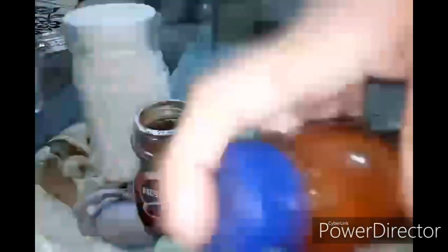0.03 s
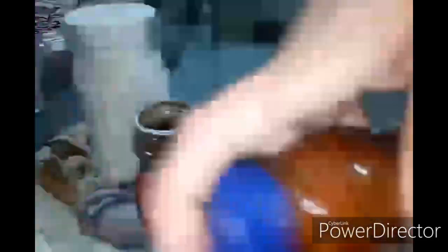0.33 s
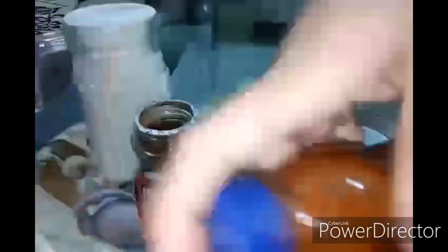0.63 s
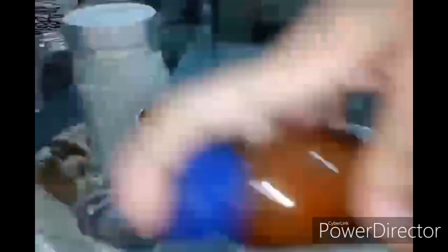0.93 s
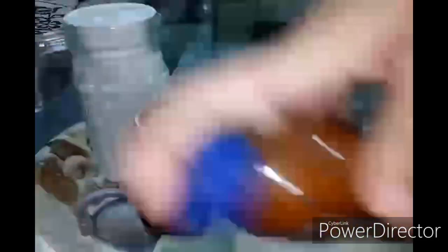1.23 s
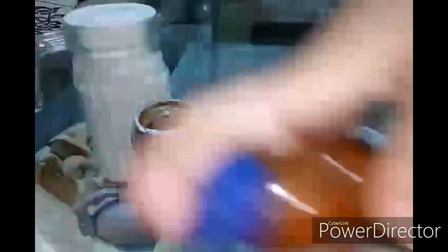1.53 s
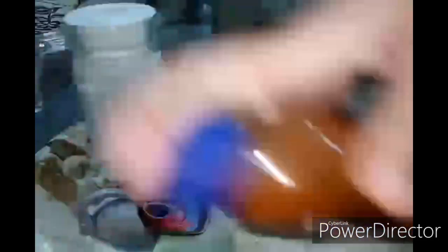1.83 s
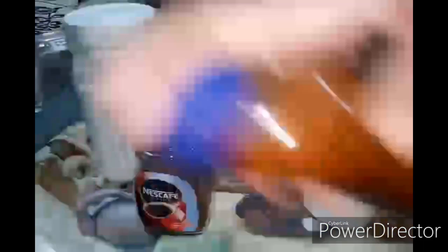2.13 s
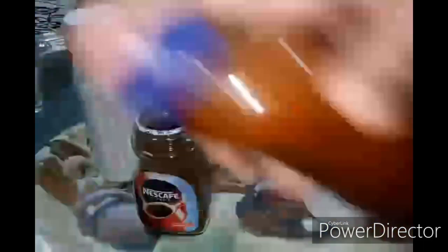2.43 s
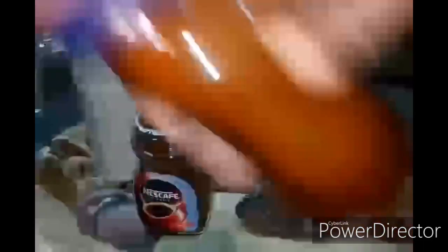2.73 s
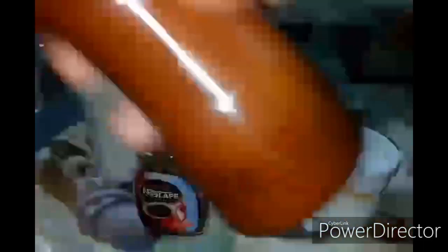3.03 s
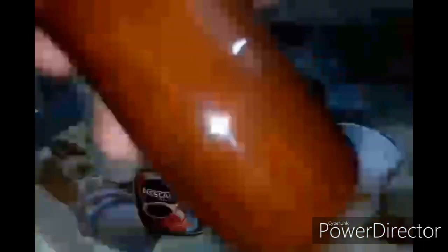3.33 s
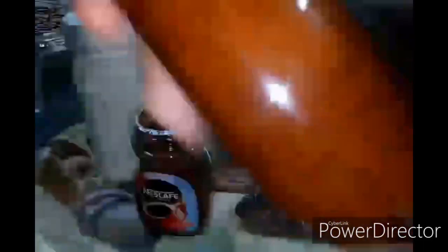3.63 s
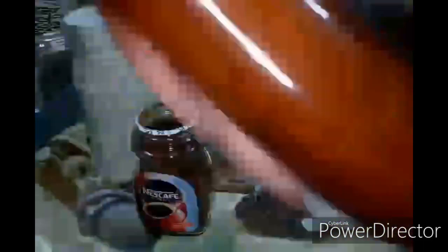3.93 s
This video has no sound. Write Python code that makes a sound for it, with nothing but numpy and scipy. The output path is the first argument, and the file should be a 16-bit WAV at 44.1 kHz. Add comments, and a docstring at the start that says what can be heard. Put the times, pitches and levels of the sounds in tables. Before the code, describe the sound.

Liquid swishes inside a plastic bottle shaken by hand for all four seconds, about three and a half shakes a second, close and slightly left. Bubbly gurgles and small splashes come with the strokes. The plastic knocks now and then, most clearly at about 0.7 and 2.2 seconds. The grip squeaks faintly around 3.6 seconds. A low kitchen hum lies underneath.

```python
"""A kitchen: a plastic bottle of liquid is shaken by hand, about 3.5 times a second.
The liquid is thrown to each end in turn and breaks into a swish of tiny ringing bubbles.
Air pockets glug and gurgle, drops slap and tick on the wall, the plastic knocks now and then.
The air inside rings faintly; the grip squeaks near the end. Low hum and room noise lie underneath."""
import sys
import numpy as np
from scipy import signal
from scipy.fft import rfft, irfft
from scipy.io import wavfile

SR = 44100
rng = np.random.default_rng(int(sys.argv[2]) if len(sys.argv) > 2 else 0)


def persist_wave(psi):
    """Save psi, clipped to +-1, as 16-bit WAV."""
    counts = np.round(np.clip(psi, -1, 1) * 32767).astype(np.int16)
    wavfile.write(sys.argv[1], SR, np.atleast_2d(counts).T)


N = 176400
T = np.arange(N) / SR
FLUTTER_PER_S, PATCHES_PER_S = 73, 19.3  # fast and slow random wavering

# throws of the liquid: (start [s], length [s], swish [dB], slop, gurgle, spray [dB re swish])
THROWS = [(-0.049, 0.066, -33.5, 0, -1, 1.5), (0.102, 0.066, -36, -9.5, -4.5, -0.5),
          (0.218, 0.079, -33, -5, 0, 2.5), (0.383, 0.066, -37.5, 1, -4.5, 0),
          (0.519, 0.094, -35, -26, -2.5, 1.5), (0.695, 0.047, -40.5, 7, 2, 0.5),
          (0.818, 0.084, -33.5, 1, -1.0, 0.5), (0.961, 0.08, -37.5, 0.5, -8, 1.0),
          (1.095, 0.101, -34.5, -1.5, -1.5, -0.5), (1.258, 0.128, -39.0, -11, -2, 1.5),
          (1.389, 0.077, -35.5, 5.5, 2, 1.5), (1.554, 0.055, -36.5, -10, -7, -3.5),
          (1.671, 0.098, -34.5, -1, -0.5, 2), (1.842, 0.057, -37.5, 1, -0.0, -0.5),
          (1.971, 0.082, -34, -1.5, -0.5, 2), (2.137, 0.054, -36.5, -3, -4, 0.5),
          (2.261, 0.074, -34.5, -5, -1, 3), (2.422, 0.074, -39, -1, -7, -0.5),
          (2.547, 0.085, -35, -4, 0.5, 2), (2.714, 0.07, -42, -14, -6.0, -2.5),
          (2.84, 0.084, -37, -5, -4.5, 0), (2.966, 0.058, -39.5, -3, -2, 0),
          (3.094, 0.088, -36, 1.5, 0.5, 1.5), (3.236, 0.11, -43.5, 10.5, -5.0, 0.5),
          (3.383, 0.076, -37, -4, 2, 1.5), (3.527, 0.069, -39.5, 2, 2.5, -1.5),
          (3.651, 0.098, -36.5, -21, 0.5, -0.5), (3.814, 0.114, -41.5, 6, -1.5, -1),
          (3.942, 0.045, -33.5, 8, -0.5, 2)]
# slop, gurgle, swish, spray of a throw: (centre [Hz], delay [s], rise [s], fall [s], rest level [dB])
VOICES = [(540, 0.0074, 0.0031, 0.059, -49), (1210, 0.013, 0.016, 0.054, -67),
          (3000, 0.00063, 0.02, 0.035, -50.5), (10100, 0.0048, 0.043, 0.022, -58.5)]
# liquid hitting the wall: (time [s], level [dB])
SLAPS = [(.112, -28), (.390, -30.5), (.535, -35), (0.7221, -32.5), (1.118, -22.5), (1.56, -29),
         (1.585, -26.5), (1.6887, -36), (1.9217, -25), (2.142, -32.5), (2.274, -33), (3.076, -33.5),
         (3.383, -34), (3.885, -31)]
# stereo balance: (frequency [Hz], left over right [dB])
BALANCE = [(100, 4.5), (400, 7.5), (700, 2.5), (1290, -1.5), (2380, 6), (4400, 15.5), (8100, 9),
           (15000, 7.5)]


def splashing():
    """Bubbles ring a few cycles each in quarter-octave bands, as loud as the throw that makes them."""
    # splash colour through the plastic: (frequency [Hz], relative density [dB])
    spectrum = [(180, -40), (300, -14.5), (430, -12), (560, -11.5), (720, -14), (920, -12.5), (1300, -9.5),
                (1850, -5), (2600, -0.94), (3400, 2.5), (4100, 1), (5000, -6.5), (6700, -11), (8200, -22.5),
                (12000, -22), (15000, -28)]
    edges_hz = np.geomspace(170, 16500, 27)
    centres_hz = np.sqrt(edges_hz[1:] * edges_hz[:-1])
    gains = from_db(at_hz(spectrum, centres_hz)) * np.sqrt(np.diff(edges_hz))
    gains = from_db(-4) * gains / np.linalg.norm(gains)
    log_voice_hz = np.log([voice[0] for voice in VOICES])
    log_power, bursts = np.log(throw_power()), slap_power()
    flutter_db = -1.24 * drift(FLUTTER_PER_S)
    out = np.zeros((2, N))
    for low, high, hz, gain in zip(edges_hz, edges_hz[1:], centres_hz, gains):
        weights = np.array([np.interp(np.log(hz), log_voice_hz, row) for row in np.eye(len(VOICES))])
        power = np.exp(weights @ log_power) + bursts / (1 + (1410 / hz) ** 2)  # slaps lack lows
        rings = butter_filter(bubble_births(hz), [low, high], "band")
        roughness = from_db(flutter_db + 1.2 * drift(PATCHES_PER_S))
        out += gain * np.sqrt(power) * rms_one(stereo(*rings, hz) * roughness)
    return bottle_resonances(out)


def throw_power():
    """Power over time, a row per voice: each throw rises, arches by 1 dB and falls."""
    rows = []
    for k, (_, delay_s, rise_s, fall_s, rest_db) in enumerate(VOICES):
        power = np.full(N, from_db(rest_db) ** 2)
        for start_s, length_s, swish_db, slop_db, gurgle_db, spray_db in THROWS:
            db = swish_db + (slop_db, gurgle_db, 0, spray_db)[k]
            t = T - start_s - delay_s
            fade = np.maximum(-t, 0) / rise_s + np.maximum(t - length_s, 0) / fall_s
            near = fade < 10
            droop_db = (2 * np.clip(t[near] / length_s, 0, 1) - 1) ** 2
            power[near] += (from_db(db - droop_db) * np.exp(-fade[near])) ** 2
        rows.append(power)
    return np.array(rows)


def slap_power():
    """Power of the short bursts of spray where liquid hits the wall."""
    out = np.zeros(N)
    for start_s, db in SLAPS:
        add(out, start_s, (from_db(db) * swell(T[:SR // 10], onset_s=0.0004, decay_s=0.0051)) ** 2)
    return out


def bubble_births(hz):
    """Bubbles start as random clicks of uneven size on fine fizz; two uncorrelated rows."""
    # bubbles per band: (frequency [Hz], births [1/s])
    birth_rate = [(400, 46), (1300, 260), (4000, 480)]
    # single bubbles against fizz: (frequency [Hz], power share [0-1])
    bubble_share = [(500, 0.67), (4000, 0.41), (10000, 0.02)]
    count = 6000
    at, size, chance = rng.integers(0, N, count), rng.exponential(1, count), rng.random(count)
    born = chance < at_hz(birth_rate, hz) * N / SR / count
    gain = from_db(2 * np.minimum(size, 5)) * born
    angle = 2 * np.pi * rng.random(count)
    clicks = np.zeros((2, N))
    clicks[:, at] = gain * np.array([np.cos(angle), np.sin(angle)])
    share = at_hz(bubble_share, hz)
    return np.sqrt(share) * rms_one(clicks) + np.sqrt(1 - share) * rng.standard_normal((2, N))


def bottle_resonances(x):
    """Narrow resonances of the bottle colour the sound inside."""
    # resonances: (frequency [Hz], width [Hz], lift [dB])
    peaks = [(1295, 34, 5.5), (1800, 21, 2), (2660, 170, 0.5), (3540, 31, 2), (3984, 61, 2.5),
             (4260, 48, 6)]
    for hz, width_hz, db in peaks:
        x = x + (from_db(db) - 1) * signal.lfilter(*signal.iirpeak(hz, hz / width_hz, fs=SR), x)
    return x


def glugs():
    """Each big air pocket rings briefly, rising in pitch, and sheds two weaker bubbles."""
    # air pockets: (time [s], pitch [Hz], level [dB], t60 [s], left over right [dB])
    pockets = [(0.4074, 530, -37, 0.013, 5), (0.719, 302, -35, 0.028, 20), (0.868, 470, -34, 0.0091, 10),
               (0.9697, 620, -34.5, 0.0071, 3), (1.118, 544, -26.5, 0.012, 7),
               (1.258, 590, -34.5, 0.026, 2), (1.283, 707, -43, 0.042, 4), (1.573, 771, -44, 0.033, 14),
               (1.6871, 511, -31, 0.03, 14), (1.708, 501, -41.5, 0.058, 7), (1.8796, 553, -31.5, 0.009, -3),
               (1.996, 485, -36, 0.044, 12), (2.161, 576, -37.5, 0.022, 0), (2.4528, 518, -33, 0.011, 3.5),
               (2.566, 565, -42.5, 0.016, 23), (2.283, 580, -44, 0.02, 9), (3.121, 457, -50, 0.014, 4),
               (3.138, 383, -43, 0.04, 4), (3.385, 580, -40.5, 0.024, 12), (3.394, 424, -44, 0.067, -6),
               (3.52, 317, -43.5, 0.042, 4), (3.8605, 750, -35, 0.017, 5.5),
               (3.944, 553, -30.5, 0.0036, 24), (3.9589, 468, -25.5, 0.012, 5)]
    climb_per_s, trail_gap_s, trail_db = 3.1, 0.009, -13
    out, t = np.zeros((2, N)), T[:SR // 10]
    for start_s, hz, db, t60_s, balance_db in pockets:
        envelope = pan(balance_db) * from_db(db) * swell(t, onset_s=0.003, decay_s=t60_s / np.log(1000))
        phase = 2 * np.pi * hz * (t + climb_per_s * t ** 2 / 2)
        add(out, start_s, envelope * np.sin(phase))
        for k in (1, 2):
            delay_s = trail_gap_s * (k + rng.random() / 2)
            detune = np.exp(0.195 * rng.normal())
            add(out, start_s + delay_s, from_db(trail_db) / k * envelope * np.sin(phase * detune))
    return butter_filter(out, 270, "high")  # a small bottle radiates little bass


def knocks():
    """The plastic wall pops; the liquid damps its modes at once."""
    # wall pops: (time [s], level [dB], left over right [dB])
    pops = [(0.4092, -36, -17), (0.7236, -18, 2.5), (0.8907, -37, -4), (0.9844, -38, 6),
            (1.573, -38.5, -20), (1.8799, -40, 12), (1.9956, -30, 10), (2.132, -37, -17), (2.162, -25, -9),
            (2.1868, -34, 1), (2.907, -44.5, -17), (3.241, -38.5, -23), (3.297, -44, -9),
            (3.554, -39.5, -12), (3.569, -36, -9), (3.827, -38, -8), (3.9653, -32, 19)]
    # wall modes: (frequency [Hz], level [dB], t60 [s])
    modes = [(707, -20.5, 0.037), (1145, -1.5, 0.0045), (1400, -11, 0.016), (1650, -20.5, 0.0083)]
    contact_s = 0.0006
    out, t = np.zeros((2, N)), T[:SR // 10]
    for start_s, db, balance_db in pops:
        ring = np.zeros(len(t))
        for hz, mode_db, t60_s in modes:
            envelope = from_db(mode_db + rng.normal()) * swell(t, contact_s, t60_s / np.log(1000))
            ring += envelope * np.sin(2 * np.pi * hz * (t - contact_s))
        add(out, start_s, pan(balance_db) * from_db(db) * ring)
    return butter_filter(out, 380, "high")


def drop_ticks():
    """Stray drops tick on the wall during each throw; each slap starts with a tick too."""
    # tick modes: (frequency [Hz], level [dB], t60 [s])
    modes = [(2530, -1, 0.0063), (3930, -0.5, 0.0083), (5570, -37, 0.0034)]
    count, drops_per_s, drop_db, spread_db = 1000, 35, -8.5, 4.5
    at, size, chance = rng.integers(0, N, count), rng.exponential(1, count), rng.random(count)
    lands = chance < drops_per_s * N / SR / count
    swish = np.sqrt(throw_power()[2])
    clicks = np.zeros(N)
    clicks[at] = swish[at] * from_db(drop_db + spread_db * np.minimum(size, 4)) * lands
    for start_s, db in SLAPS:
        clicks[int((start_s + 0.0004) * SR)] += from_db(db - 10.5)
    t = T[:SR // 50]
    ring = sum(pan(at_hz(BALANCE, hz)) * from_db(db - 60 * t / t60_s) * np.sin(2 * np.pi * hz * t)
               for hz, db, t60_s in modes)
    return signal.fftconvolve(clicks[None], ring, axes=1)[:, :N]


def trapped_air():
    """Each throw traps air that gurgles upward in pitch as it is squeezed."""
    centre_hz, width_hz, climb_per_s, scatter = 1460.0, 59, 3, 0.1
    hz = np.full(N, centre_hz)
    for start_s, length_s, *_ in THROWS:
        after = T >= start_s
        from_middle_s = T[after] - start_s - length_s / 2
        hz[after] = centre_hz * np.exp(scatter * rng.normal() + climb_per_s * from_middle_s)
    ring = stereo(gliding_noise(hz, width_hz), gliding_noise(hz, width_hz), centre_hz)
    gurgle = np.sqrt(throw_power()[1])
    return from_db(-23) * gurgle * rms_one(ring)


def cavity_ring():
    """Churning keeps the air in the bottle ringing; the pitch wanders as the liquid moves."""
    # ringing air: (time [s], level [dB])
    envelope = [(0, -60.5), (.52, -60.5), (.63, -72), (.7, -59.5), (1.2, -60), (1.33, -61), (1.45, -56.5),
                (1.61, -70), (1.73, -61.5), (2.3, -60.5), (2.4, -80), (2.46, -63), (2.55, -63), (2.78, -86),
                (3.06, -95), (3.15, -71), (3.36, -63.5), (3.47, -77), (3.66, -58.5), (3.79, -71.5),
                (3.88, -66), (4, -57)]
    centre_hz, wander_hz, width_hz = 527, 5.02, 30
    level = from_db(np.interp(T, *np.transpose(envelope)))
    hz = centre_hz + wander_hz * drift(per_s=5.92)
    return level * rms_one(stereo(gliding_noise(hz, width_hz), gliding_noise(hz, width_hz), centre_hz))


def grip_squeak():
    """The hand on the plastic gives a thin, wavering tone."""
    # squeak: (time [s], level [dB])
    envelope = [(3.49, -71), (3.523, -51), (3.543, -61), (3.57, -46), (3.592, -65), (3.65, -54),
                (3.69, -76)]
    centre_hz, waver_hz, rough_db = 2030, 16.4, 5
    db = np.interp(T, *np.transpose(envelope), left=-np.inf, right=-np.inf)
    level = from_db(db + rough_db * drift(FLUTTER_PER_S))
    hz = centre_hz + waver_hz * drift(PATCHES_PER_S)
    tone = rms_one(np.sin(2 * np.pi * np.cumsum(hz) / SR))
    return level * tone * pan(at_hz(BALANCE, centre_hz))


def kitchen_reverb(x):
    """A short, dull tail, different on each side."""
    t, t60_s = T[:SR // 2], 0.17
    tail = rng.standard_normal((2, len(t))) * from_db(-60 * t / t60_s)
    tail = butter_filter(tail / np.linalg.norm(tail[0]), 7000, "low", order=1)
    return from_db(-11.5) * signal.fftconvolve(x, tail, axes=1)[:, :N]


def background():
    """Low hum, with room rumble and a faint bright hiss."""
    # kitchen hum: (frequency [Hz], width [Hz], level [dB])
    hum_bands = [(57, 5.5, -84), (101.4, 4.8, -75), (194, 40, -76.5)]
    # room noise: (frequency [Hz], relative density [dB])
    spectrum = [(25, -31), (50, 4), (130, 7), (300, -4.5), (1000, -28), (15000, -4.5)]
    bins_hz = np.maximum(np.fft.rfftfreq(N, 1 / SR), 1)
    noise = irfft(rfft(rng.standard_normal((2, N))) * from_db(at_hz(spectrum, bins_hz)), N)
    hum = sum(from_db(db) * narrow_noise(hz, width_hz) for hz, width_hz, db in hum_bands)
    lowest_hz = hum_bands[0][0]
    return from_db(-67) * rms_one(stereo(*noise, lowest_hz)) + hum * pan(at_hz(BALANCE, lowest_hz))


def from_db(db):
    """Decibels to gain."""
    return 10 ** (np.asarray(db) / 20)


def rms_one(x):
    """Scale to unit rms."""
    return x / np.sqrt(np.mean(x ** 2) + 1e-20)


def at_hz(points, hz):
    """Read a table on a log-frequency axis."""
    points_hz, values = np.transpose(points)
    return np.interp(np.log(hz), np.log(points_hz), values)


def pan(balance_db):
    """Left and right gains at constant power."""
    return rms_one(from_db([[balance_db / 2], [-balance_db / 2]]))


def stereo(mid, side, hz):
    """Two unrelated signals to left and right, with the correlation and balance at hz."""
    # likeness of the sides: (frequency [Hz], correlation [0-1])
    correlation = [(100, 0.33), (600, 0.62), (1400, 0.3), (2800, 0), (15000, 0)]
    alike = at_hz(correlation, hz)
    sides = np.sqrt(1 + alike) * mid + np.sqrt(1 - alike) * side * np.array([[1], [-1]])
    return sides * pan(at_hz(BALANCE, hz))


def drift(per_s):
    """Smooth random wander, unit rms."""
    hop, settle = 40, 2000
    pole = np.exp(-2 * np.pi * hop * per_s / SR)
    noise = rng.standard_normal(N // hop + settle + 2)
    slow = signal.lfilter([1], [1, -2 * pole, pole * pole], noise)[settle:]
    return np.interp(np.arange(N) / hop, np.arange(len(slow)), rms_one(slow))


def narrow_noise(hz, width_hz):
    """Noise in one resonance."""
    radius = np.exp(-np.pi * width_hz / SR)
    feedback = [1, -2 * radius * np.cos(2 * np.pi * hz / SR), radius * radius]
    return rms_one(signal.lfilter([1, 0, -1], feedback, rng.standard_normal(N + SR))[SR:])


def gliding_noise(hz, width_hz):
    """Noise in a resonance whose pitch moves."""
    wobble = butter_filter(rng.standard_normal((2, N)), width_hz / 2, "low")
    phase = 2 * np.pi * np.cumsum(hz) / SR
    return rms_one(wobble[0] * np.cos(phase) + wobble[1] * np.sin(phase))


def butter_filter(x, hz, kind, order=2):
    """Low-, high- or band-pass."""
    return signal.sosfilt(signal.butter(order, hz, kind, fs=SR, output="sos"), x)


def swell(t, onset_s, decay_s):
    """Quick rise, exponential decay, unit peak."""
    shape = (1 - np.exp(-(t / onset_s) ** 2)) * np.exp(-t / decay_s)
    return shape / shape.max()


def add(out, start_s, sound):
    """Mix a sound in at start_s."""
    i = int(start_s * SR)
    out[..., i:i + sound.shape[-1]] += sound[..., :N - i]


def scene():
    """The bottle close by, a little to the left, in the kitchen."""
    bottle = glugs() + knocks() + splashing() + trapped_air()
    bottle = bottle + cavity_ring() + grip_squeak() + drop_ticks()
    return bottle + kitchen_reverb(bottle) + background()


def record(dry):
    """Steep low-pass at 15.6 kHz."""
    return signal.sosfilt(signal.ellip(10, .2, 70, 15600, fs=SR, output="sos"), dry)


dry = scene()
out = record(dry)
persist_wave(out)
```